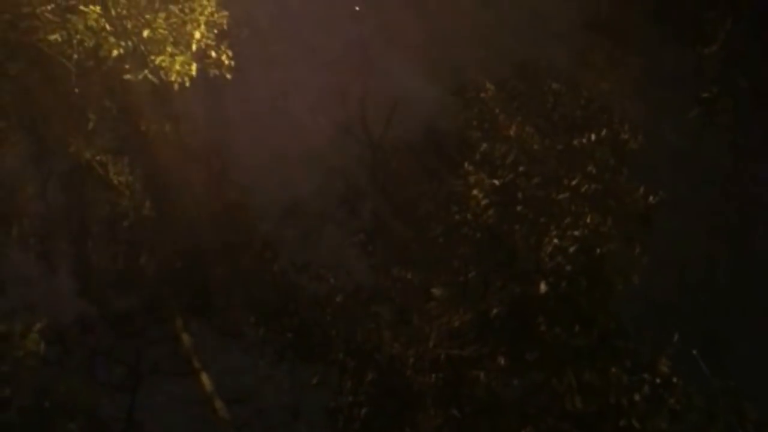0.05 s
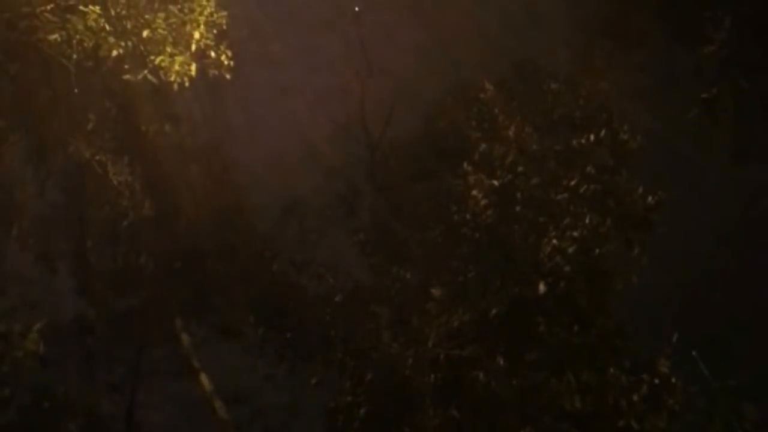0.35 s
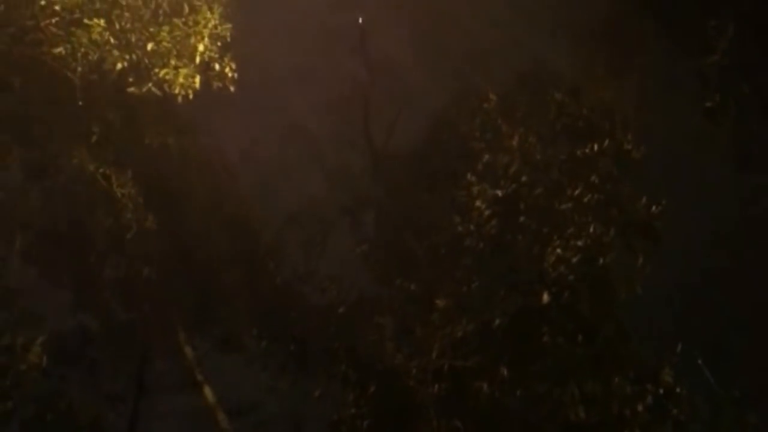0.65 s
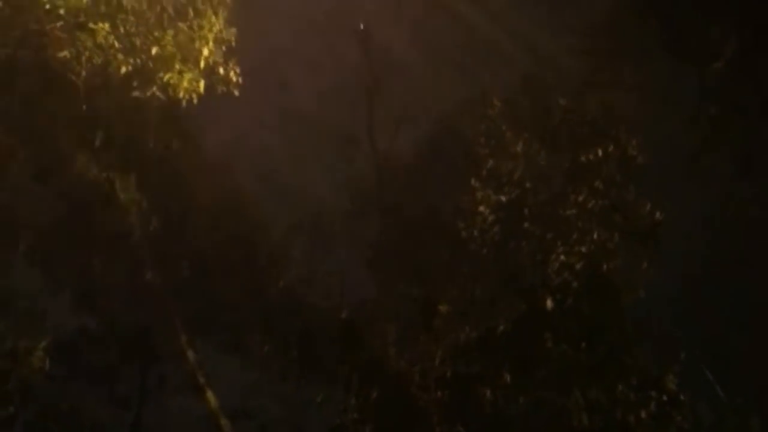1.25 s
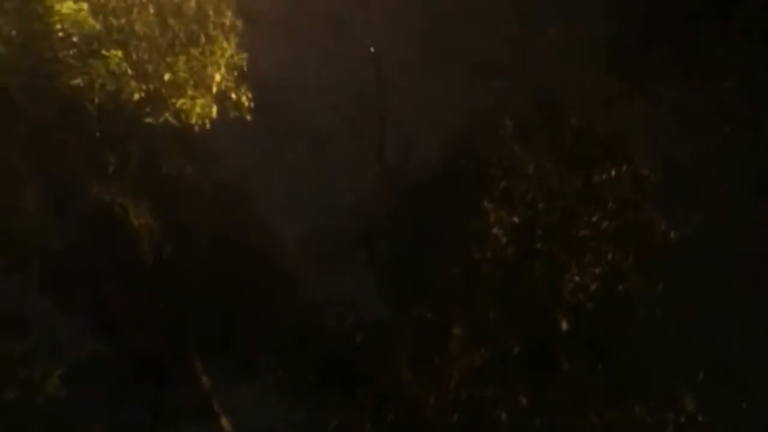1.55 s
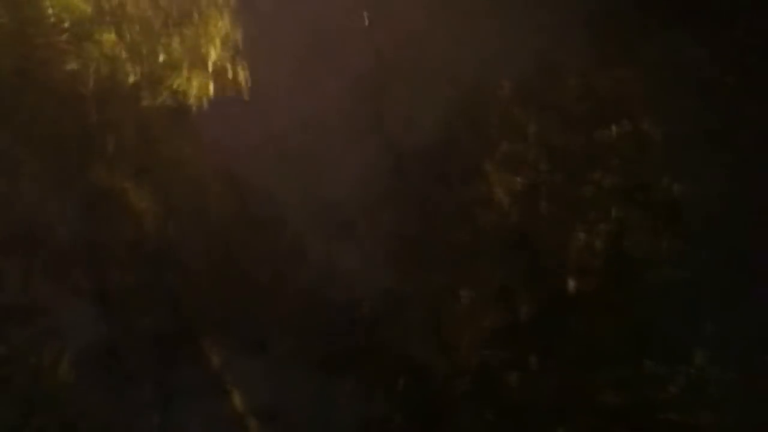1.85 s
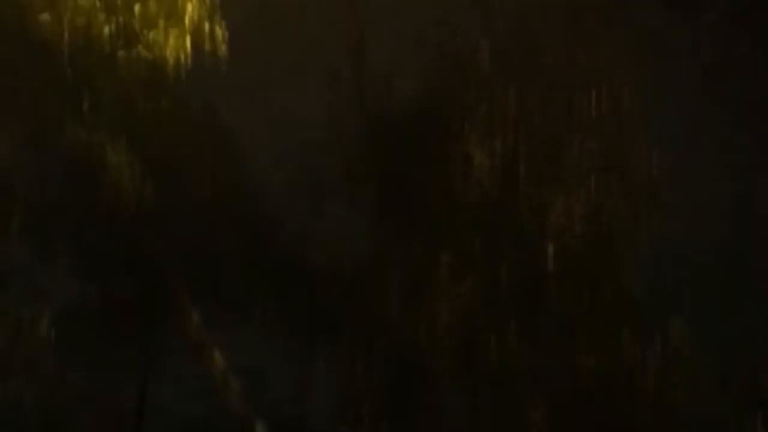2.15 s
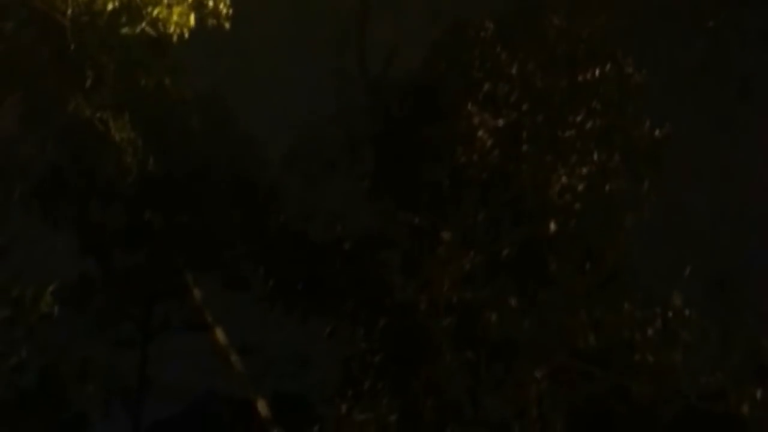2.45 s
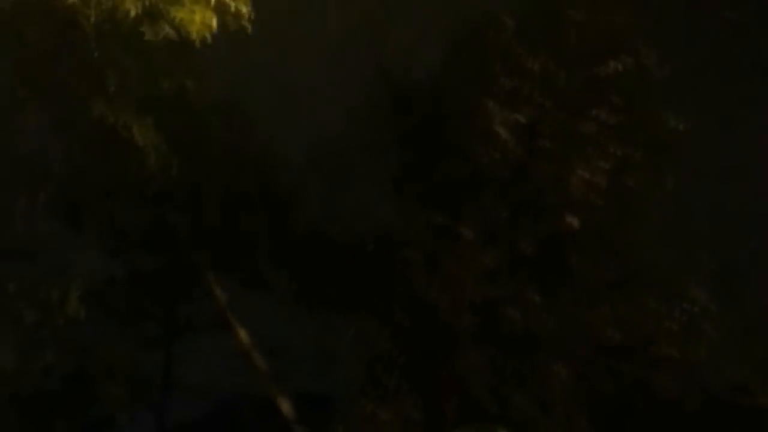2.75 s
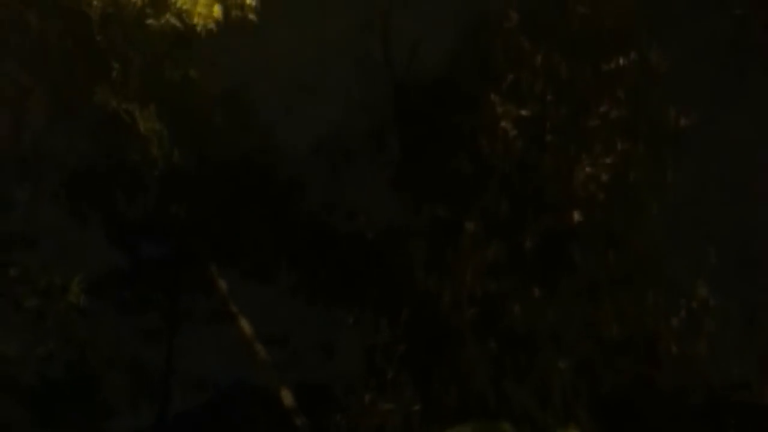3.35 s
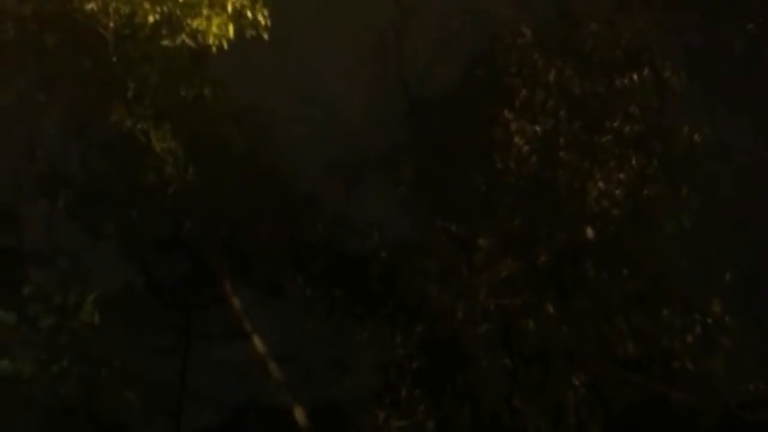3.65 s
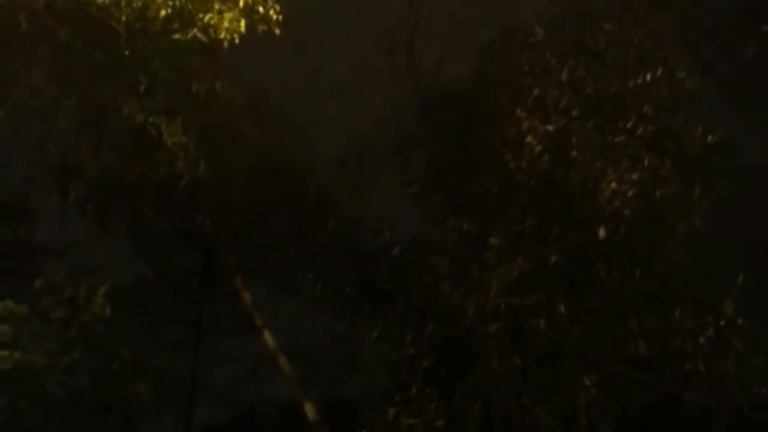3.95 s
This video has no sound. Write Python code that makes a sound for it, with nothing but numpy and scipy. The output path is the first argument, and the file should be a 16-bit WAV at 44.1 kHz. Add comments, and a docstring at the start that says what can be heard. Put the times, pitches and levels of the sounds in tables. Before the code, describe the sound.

In a wood at night, a bird calls a falling series of pure, sad whistles, two clear and the rest faint. Close finger rustles, ticks and soft knocks on the microphone continue afterwards over quiet insect hiss.

```python
"""A high, mournful whistle opens a potoo's falling series of nearly pure notes, echoing in a wood at night.
Behind it: a low rumble of air, a faint far drone and throbbing bands of insect trills.
Fingers rub and tick on the camera, with a few soft hollow knocks. Its noise suppressor holds the
background down, so the hiss swells with every loud note and rustle."""
import sys
import numpy as np
from scipy import signal
from scipy.fft import rfft, irfft
from scipy.io import wavfile
from scipy.ndimage import uniform_filter1d

SR = 44100
rng = np.random.default_rng(int(sys.argv[2]) if len(sys.argv) > 2 else 0)


def output_pcm(signal):
    """Save a mono or channel-first signal as 16-bit PCM at the path in sys.argv[1].

    Samples are clipped to [-1, 1] before scaling.
    """
    pcm = np.clip(np.atleast_2d(signal).T, -1, 1) * 32767
    wavfile.write(sys.argv[1], SR, np.round(pcm).astype(np.int16))


N = 176400
T = np.arange(N) / SR

# Night air. Each row: frequency in Hz, relative spectral density in dB.
AIR_SPECTRUM = [(15, -60.5), (25, -25), (37, -12), (52, -5), (70, -2), (189, -6), (211, -6.5), (248, -6.5),
                (425, -9.5), (461, -11), (857, -13.5), (1040, -17.5), (1120, -17.5), (2030, -21),
                (4450, -19.5), (5090, -13), (5820, -20), (11700, -32.5), (15800, -36)]
# Far drone. Each row: pitch in Hz, width in Hz, level in dB.
DRONE_BANDS = [(71, 5.1, -63.5), (281, 15, -64)]
# Insect choirs. Each row: pitch in Hz, width in Hz, level in dB, end of fade-in in seconds.
INSECT_CHOIRS = [(4872, 100, -57, 0), (5024, 65, -60, 0.5), (5220, 106, -57.5, 0.5),
                 (6870, 1700, -61.5, 0.5), (11500, 150, -71.5, 3)]
# Hollow knocks. Each row: centre in seconds, pitch in Hz, width in Hz, half-length in seconds,
# level in dB.
HOLLOW_BUMPS = [(0.312, 437, 130, 0.02, -46), (0.708, 1520, 200, 0.0049, -53),
                (0.869, 1320, 400, 0.0037, -48), (1.016, 429, 71.6, 0.013, -42),
                (1.1, 1760, 1310, 0.0057, -38), (1.649, 436, 90, 0.018, -46.5)]
# Finger rubs. Each row: start in seconds, then rise, release onset and decay time in seconds,
# level in dB, tilt above 1 kHz in dB per octave.
FINGER_RUBS = [(.318, .015, 0.023, 0.023, -45, -2.5), (.36, 0.01, 0.018, 0.019, -46.5, -1.5),
               (.53, 0.0087, 0.02, 0.023, -48.5, -5), (.858, 0.0081, 0.013, 0.021, -45, -9.5),
               (1.085, 0.0036, 0.016, 0.041, -42.5, -4), (1.192, 0.006, 0.013, 0.046, -42.5, -2),
               (1.322, 0.0078, 0.014, 0.015, -42.5, -3), (1.598, 0.0023, 0.037, 0.025, -41, 1.5),
               (1.703, 0.0044, 0.023, 0.037, -42, 2), (1.933, 0.01, 0.026, 0.071, -44.5, -3),
               (2.44, .01, .045, 0.026, -52, -2), (2.706, .002, 0.026, 0.016, -41.5, -2),
               (3.11, 0.011, 0.025, 0.025, -49, -3), (3.284, .002, 0.02, 0.052, -44.5, 0.5),
               (3.478, 0.0077, 0.032, 0.03, -50, 0), (3.628, 0.0088, 0.016, 0.012, -50, -4),
               (3.816, 0.0039, 0.02, 0.019, -40.5, 2), (3.86, 0.013, .03, 0.3, -52.5, -2.5)]
# Finger friction. Each row: frequency in Hz, relative gain in dB.
RUB_SPECTRUM = [(60, -6.5), (400, -7.5), (1000, -3.5), (2500, -5.5), (4000, -1), (5100, 11.5), (5800, 3.5),
                (7500, 2.5), (10000, -8.5), (16000, -15)]
# Casing ticks. Each row: start in seconds, peak in dB, ring pitch in Hz, decay time in seconds.
CASING_TICKS = [(.006, -35, 6350, 0.0019), (0.077, -36, 5900, 0.00061), (1.097, -32, 2190, .0012),
                (1.204, -30.5, 4880, .001), (1.342, -30.5, 5900, 0.00057), (1.604, -24, 7260, 0.0021),
                (1.611, -26.5, 6500, 0.00095), (1.621, -29, 6950, .0009), (1.628, -23.5, 6650, 0.0012),
                (1.632, -25, 6700, 0.00074), (1.6359, -25, 6700, .0014), (1.708, -24, 7750, 0.0011),
                (1.964, -38, 6550, .001), (2.7114, -25, 4860, 0.0005), (2.723, -37, 4560, 0.0025),
                (3.287, -33.5, 5960, 0.00069), (3.827, -29, 6300, 0.0039), (3.833, -42, 6560, 0.0016)]
# The potoo's three opening contours. Each row: time in seconds, pitch in Hz, level in dB.
HIGH_CONTOUR = [(0, 985, -33), (.007, 1005, -30), (.018, 1010, -23.5), (.03, 1000, -24), (.048, 980, -31),
                (.075, 966, -33), (.088, 977, -28), (.11, 970, -31), (.168, 967, -33.5), (.189, 955, -30.3),
                (.21, 940, -41.5), (.25, 965, -45), (.31, 965, -53)]
SLIDE_CONTOUR = [(.315, 950, -60), (.34, 960, -50.5), (.375, 965, -51), (.41, 1005, -49), (.47, 950, -51),
                 (.52, 885, -50), (.54, 865, -43), (.56, 845, -41.5), (.576, 820, -50)]
LOW_CONTOUR = [(.576, 815, -44), (.589, 803, -33.3), (.62, 797, -32.8), (.7, 794, -35.5), (.76, 788, -35.3),
               (.805, 785, -37.3), (.85, 790, -35), (.893, 780, -36.5), (.907, 750, -52),
               (.925, 795, -44.5), (.97, 788, -49), (1.05, 785, -54)]
# Fuzzy tones above the high and the low note. Each row: pitch in Hz, width in Hz, dB relative to the note.
SIDE_BANDS = [(1170, 24, -21.5), (1203, 69, -28.5)]
# Faint closing notes. Each row: start and length in seconds, first and last pitch in Hz, level in dB.
CLOSING_NOTES = [(1.09, .21, 812, 789, -54.5), (1.3, .17, 765, 731, -53.5), (1.89, .14, 672, 657, -56),
                 (2.045, 0.16, 720, 698, -55)]
# Suppressor depth. Each row: frequency in Hz, dB of cut per dB below the threshold.
CUT_SLOPES = [(60, 1.02), (200, 1.0), (400, 1.0469), (2000, 0.9875), (5000, 0.8334), (15000, 0.59)]


def amp(db):
    """Decibels to gain."""
    return 10 ** (np.asarray(db) / 20)


def unit(x):
    """Scales to rms 1."""
    return x / np.sqrt(np.mean(x ** 2) + 1e-20)


def curve_at(points, hz):
    """Interpolates a table on a log-frequency axis."""
    f, value = np.transpose(points)
    return np.interp(np.log(hz + 1), np.log(f + 1), value)


def colour(x, gain):
    """Filters by a gain that is a function of frequency."""
    return irfft(rfft(x) * gain(np.fft.rfftfreq(len(x), 1 / SR)), len(x))


def drift(rate_hz):
    """Random wander of rms 1, up to the given rate."""
    return unit(colour(rng.standard_normal(N), lambda f: (f > 0) / (1 + (f / rate_hz) ** 4)))


def noise_band(hz, width_hz):
    """Band of noise, rms 1; a fuzzy tone when narrow."""
    noise = rng.standard_normal(N)
    return unit(colour(noise, lambda f: 1 / (1 + ((f - hz) / (width_hz / 2)) ** 4) ** .5))


def lag(x, tau_s):
    """One-pole follower."""
    pole = np.exp(-1 / (tau_s * SR))
    return signal.lfilter([1 - pole], [1, -pole], x, zi=[pole * x[:256].mean()])[0]


def air(level_db=-48.5, patch_db=1.76):
    """Low rumble and far insect hiss, slightly patchy in time and frequency."""
    hz, _, spectra = signal.stft(rng.standard_normal(N), SR, nperseg=2048, noverlap=1536)
    patches = uniform_filter1d(rng.standard_normal(spectra.shape), size=16, axis=0)
    patches = unit(uniform_filter1d(patches, size=6, axis=1))
    spectra = spectra * amp(curve_at(AIR_SPECTRUM, hz)[:, None] + patch_db * patches)
    return amp(level_db) * unit(signal.istft(spectra, nperseg=2048, noverlap=1536)[1][:N])


def drone():
    """Faint far hum of narrow, low noise bands."""
    return sum(amp(db) * noise_band(hz, width_hz) for hz, width_hz, db in DRONE_BANDS)


def insects(throb_hz=8, throb_db=2.4, fade_s=0.33):
    """Overlapping trills merge into throbbing bands; the highest fades in late."""
    out = np.zeros(N)
    for hz, width_hz, db, full_s in INSECT_CHOIRS:
        fade = np.clip(1 + (T - full_s) / fade_s, 0, 1)
        choir = noise_band(hz, width_hz) * amp(throb_db * drift(throb_hz))
        out += amp(db) * fade * unit(choir)
    return out


def bumps():
    """Hollow puffs and knocks: noise bands under short bell-shaped envelopes."""
    out = np.zeros(N)
    for centre_s, hz, width_hz, half_s, db in HOLLOW_BUMPS:
        envelope = np.exp(-((T - centre_s) / half_s) ** 2)
        out += amp(db) * np.sqrt(np.mean(envelope ** 2)) * unit(envelope * noise_band(hz, width_hz))
    return out


def finger_rubs(grain_depth=0.36, grain_hz=910):
    """Grainy friction of fingers on the camera: quick rise, short hold, decay."""
    out = np.zeros(N)
    friction = rng.standard_normal(N) * np.exp(grain_depth * drift(grain_hz))
    for start_s, rise_s, release_at_s, decay_s, db, tilt_db in FINGER_RUBS:
        t = T - start_s
        envelope = np.clip(t / rise_s, 0, 1) * np.exp(-np.maximum(t - release_at_s, 0) / decay_s)
        rub = colour(friction,
                     lambda f: amp(curve_at(RUB_SPECTRUM, f) + tilt_db * np.log2(np.maximum(f, 1000))))
        out += amp(db) * envelope * unit(rub)
    return out


def casing_ticks(ring_q=7.8, crack_gain=0.14):
    """Tiny slips crack and ring the casing for a millisecond or so."""
    out = np.zeros(N)
    t = T[:1024]
    for start_s, peak_db, ring_hz, decay_s in CASING_TICKS:
        crack = rng.standard_normal(len(t))
        ring = unit(signal.lfilter(*signal.iirpeak(ring_hz, ring_q, SR), crack))
        tick = np.exp(-t / decay_s) * (ring + crack_gain * crack)
        slot = out[round(start_s * SR):][:len(t)]
        slot += (amp(peak_db) * tick / abs(tick).max())[:len(slot)]
    return out


def tree_echoes(x, gain_db=-27, t60_s=0.99, rise_s=0.0067):
    """Trees scatter the sound into a diffuse, decaying tail."""
    t = T[:SR]
    tail = rng.standard_normal(SR) * np.exp(-np.log(1000) * t / t60_s) * np.minimum(t / rise_s, 1)
    return amp(gain_db) * signal.fftconvolve(x, tail / np.linalg.norm(tail))[:N]


def whistle(contour, flutter_db, waver_depth=0.0025, waver_hz=60, edge_s=0.001):
    """One nearly pure note, wavering in pitch and level; returns tone and envelope."""
    times_s, hz, db = np.transpose(contour)
    pitch_hz = np.interp(T, times_s, hz) * (1 + waver_depth * drift(waver_hz))
    gate = np.clip(np.minimum(T - times_s[0], times_s[-1] - T) / edge_s, 0, 1)
    envelope = gate * amp(np.interp(T, times_s, db) + flutter_db * drift(waver_hz))
    return np.sqrt(2) * envelope * np.sin(2 * np.pi * np.cumsum(pitch_hz) / SR), envelope


def potoo(loud_flutter_db=0.3, soft_flutter_db=0.8, fade_s=0.028):
    """A high whistle, a soft slide down to a low one, then faint notes that sink further."""
    out, _ = whistle(SLIDE_CONTOUR, soft_flutter_db)
    for contour, (hz, width_hz, db) in zip([HIGH_CONTOUR, LOW_CONTOUR], SIDE_BANDS):
        tone, envelope = whistle(contour, loud_flutter_db)
        out += tone + envelope * amp(db) * noise_band(hz, width_hz)
    for start_s, length_s, first_hz, last_hz, db in CLOSING_NOTES:
        end_s = start_s + length_s
        swell = np.clip(np.minimum(T - start_s, end_s - T) / fade_s, 0, 1)
        tone, _ = whistle([(start_s, first_hz, db), (end_s, last_hz, db)], soft_flutter_db)
        out += swell * tone
    return out


def scene():
    """The bird among the trees, the night around it and the hand on the camera; mono."""
    bird = potoo()
    night = drone() + air() + insects()
    handling = finger_rubs() + casing_ticks() + bumps()
    return (night + handling + bird + tree_echoes(bird))[None]


def suppressor(x, threshold_db=-31, quick_s=0.0022, slow_s=0.014, slow_share=0.55, low_cut_hz=300):
    """Downward expander: the further the detected level is below threshold, the deeper the cut."""
    detected = colour(x, lambda f: f ** 2 / (f ** 2 + low_cut_hz ** 2)) ** 2
    power = (1 - slow_share) * lag(detected, quick_s) + slow_share * lag(detected, slow_s)
    below_db = np.minimum(10 * np.log10(power + 1e-12) - threshold_db, 0)
    hz, frames_s, spectra = signal.stft(x, SR, nperseg=256, noverlap=192)
    gain_db = curve_at(CUT_SLOPES, hz)[:, None] * np.interp(frames_s, T, below_db)
    return signal.istft(spectra * amp(gain_db), nperseg=256, noverlap=192)[1][:N]


def record(dry):
    """The camera's noise suppressor, then its band limit."""
    cutoff_hz = 15900
    lowpass = signal.firwin(511, cutoff_hz, window=("kaiser", 9), fs=SR)
    return signal.oaconvolve(suppressor(dry[0]), lowpass, "same")[None]


dry = scene()
out = record(dry)
output_pcm(out)
```